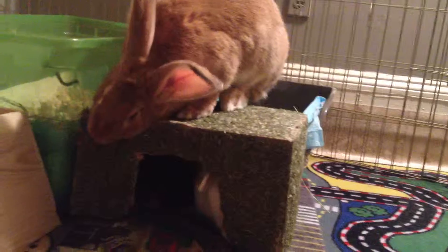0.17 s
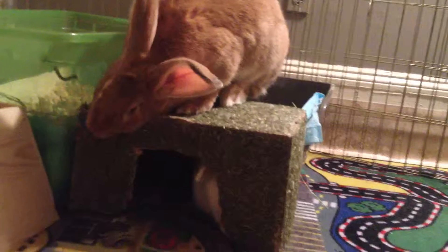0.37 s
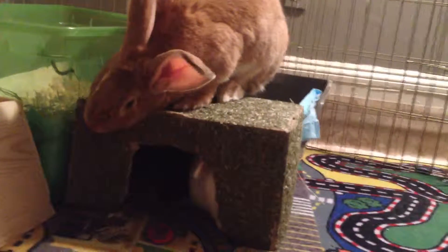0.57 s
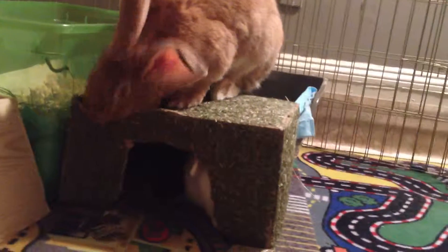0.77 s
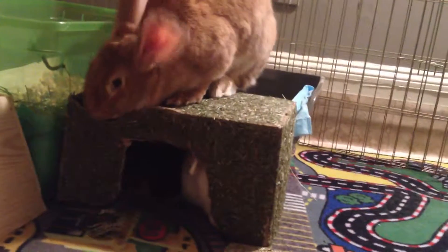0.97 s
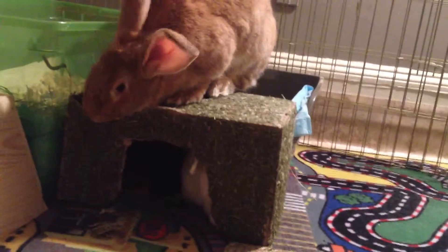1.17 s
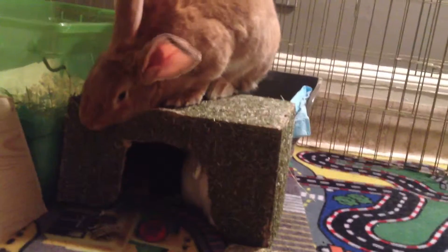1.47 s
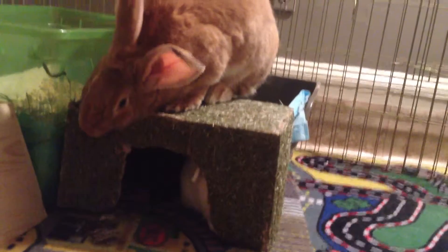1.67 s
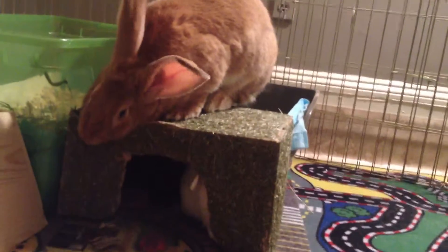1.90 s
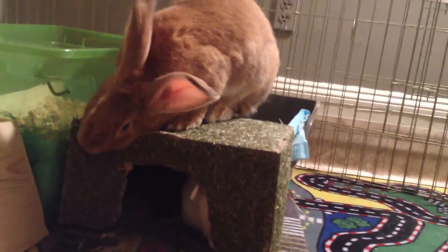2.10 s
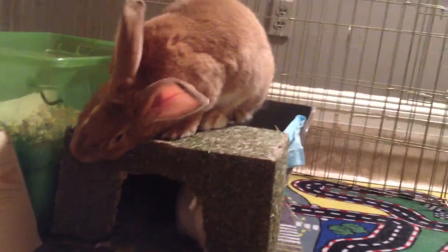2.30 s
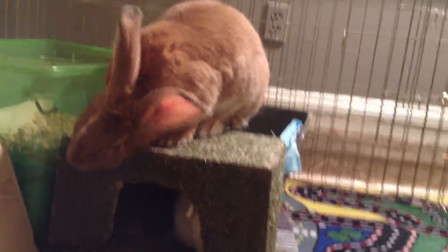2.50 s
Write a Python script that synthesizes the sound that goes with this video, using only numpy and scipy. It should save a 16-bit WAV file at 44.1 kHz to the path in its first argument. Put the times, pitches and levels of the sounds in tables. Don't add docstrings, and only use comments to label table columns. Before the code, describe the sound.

A rabbit gnaws a hollow pressed-grass box, with crisp crunches and woody thumps in a quiet room

```python
import sys
import numpy as np
from scipy import signal
from scipy.fft import rfft, irfft
from scipy.io import wavfile
from scipy.ndimage import uniform_filter1d

SR = 44100
rng = np.random.default_rng(int(sys.argv[2]) if len(sys.argv) > 2 else 0)


def boost_factor(decibels):
    exponent = np.asarray(decibels, float) / 20
    return 10 ** exponent


def transcribe(signal):
    frames = np.atleast_2d(signal).T
    limited = np.clip(frames, -1, 1)
    pcm = np.round(limited * 32767).astype(np.int16)
    wavfile.write(sys.argv[1], SR, pcm)


N = 116865
TOP_HZ, MIC_LOW_HZ = 15400, 81.3


def unit(x):
    return x / np.sqrt(np.mean(x ** 2))


def band(x, lo_hz, hi_hz, order=2):
    edges = [lo_hz, min(hi_hz, SR * .45)]
    return signal.sosfilt(signal.butter(order, edges, "band", fs=SR, output="sos"), x)


def highpass(x, hz):
    return signal.sosfilt(signal.butter(2, hz, "high", fs=SR, output="sos"), x)


def add(out, s, x):
    i = int(s * SR)
    out[i:i + len(x)] += x[:max(N - i, 0)]


# [f/Hz, spectral level/dB]
AIR_COLOUR = [(30, -25), (90, -4), (240, -2), (500, -6), (1000, -11), (2200, -19), (5000, -21),
              (15000, -23.5)]


def floor():
    air_db, hum_db, hum_hz, hum_width_hz = -67, -72, 236.2, 3.6
    colour_hz, colour_db = np.array(AIR_COLOUR).T
    f = np.arange(N // 2 + 1) * SR / N + 1
    db = np.interp(np.log(f), np.log(colour_hz), colour_db)
    air = unit(irfft(rfft(rng.standard_normal(N)) * boost_factor(db), N))
    hum = unit(band(rng.standard_normal(N), hum_hz - hum_width_hz / 2, hum_hz + hum_width_hz / 2, order=1))
    return boost_factor(air_db) * air + boost_factor(hum_db) * hum


# [f/Hz, t60/s]
ROOM_DECAY = [(120, 0.32), (300, 0.29), (800, 0.19), (2000, 0.28), (5000, 0.19), (12000, 0.1)]


def room_tail():
    lump_db, lump_from_hz, delay_s = 2.5, 2000, 0.0019
    t = np.arange(SR // 2) / SR
    lumps = boost_factor(lump_db * unit(uniform_filter1d(rng.standard_normal(len(t)), size=60)))
    decay_hz, decay_t60 = np.array(ROOM_DECAY).T
    tail = np.zeros(len(t))
    for hz in 70 * 2 ** np.arange(0, 8, .5):
        t60 = np.interp(np.log(hz), np.log(decay_hz), decay_t60)
        noise = rng.standard_normal(len(t)) * (lumps if hz > lump_from_hz else 1)
        tail += band(noise, hz / 0.966, hz * 1.422) * 1000. ** (-t / t60) / np.sqrt(t60)
    tail *= np.clip(t / delay_s, 0, 1) ** 2
    return tail / np.sqrt(np.sum(tail ** 2))


def room(x, count=4):
    spot_s = .06
    turn = np.arange(N) / SR / spot_s
    out = np.zeros(N)
    for k in range(count):
        away = np.abs((turn - k) % count - count / 2)
        share = np.cos(np.pi / 2 * np.minimum(away, 1))
        out += signal.fftconvolve(x * share, room_tail())[:N]
    return out


# [t/s, peak level/dB, f/Hz, length/s]
ROCKS = [(0.05, -47.5, 71, 0.0091), (.058, -41.5, 198, 0.021), (0.243, -50, 70, .012),
         (.413, -44.5, 123, 0.026), (.47, -55, 200, 0.037), (.535, -44, 168.6, 0.038),
         (.7, -46.5, 189, 0.031), (.725, -50.5, 119, 0.033), (.77, -50, 188, 0.036),
         (1.515, -53, 205, 0.025), (1.577, -61, 109, 0.035), (1.61, -54, 185, 0.051),
         (1.875, -47, 134, 0.032), (1.942, -57, 212, 0.024), (2.165, -49, 163, 0.021),
         (2.22, -53, 212, 0.019), (2.295, -55, 122, 0.029), (2.36, -50, 160, 0.028)]


def rocks():
    sag = .1
    out = np.zeros(N)
    for s, db, hz, length in ROCKS:
        u = np.arange(int(2 * length * SR)) / SR / length
        swell = (np.e * u * 2 * np.exp(-u * 2)) ** 2
        cycles = hz * length * u * (1 + sag * (.5 - u / 2))
        add(out, s, boost_factor(db) * swell * np.sin(2 * np.pi * cycles))
    return out


# [f/Hz, level/dB, t60/s]
BOX_MODES = [(132.8, -10, 0.3), (160, 2.5, 0.098), (200, -4, 0.15), (250.9, 10, 0.077), (330, -2, 0.09),
             (442.6, 5.5, 0.043), (534, 0.5, 0.038), (630, 3, 0.028), (825, -4, 0.04), (984, 4.5, 0.04),
             (1162, -0.5, 0.02), (1420, -9.5, 0.036), (1787, -5.5, 0.013), (2142, 6, 0.0074)]


def ring(draw, favour_hz=330, bright_db=0):
    favour_db, favour_oct, scatter_db, jitter = 9, 0.23, 2, .025
    bright_from_hz, bright_top_hz = 880, 1340
    rise_cycles, late_hz, crest_s = 1.3, 400, .004
    damp_cycles = 26
    sag, sag_s = 0.038, 0.0065
    t = np.arange(SR // 4) / SR
    hz, db, t60 = np.array(BOX_MODES).T[:, :, None]
    level_draw, pitch_draw = draw[0][:, None], draw[1][:, None]
    near = np.exp(-.5 * (np.log2(hz / favour_hz) / favour_oct) ** 2)
    bright = (hz > bright_from_hz) * np.minimum(bright_top_hz / hz, 1)
    db = db + favour_db * near + bright_db * bright + scatter_db * level_draw
    rise_s = rise_cycles / hz * np.maximum(late_hz / hz, 1)
    rise = 1 - np.exp(-(t / rise_s) ** 2)
    decay = 1000. ** (-t / np.minimum(t60, damp_cycles / hz))
    clock = t - crest_s + sag * sag_s * (1 - np.exp(-t / sag_s))
    wave = np.cos(2 * np.pi * hz * (1 + jitter * pitch_draw) * clock + level_draw)
    return highpass(np.sum(boost_factor(db) * decay * rise * wave, axis=0), 121)


def grains(per_s):
    spread_db, grain_ms = 1.8, 0.29
    hits = (rng.random(N) < per_s / SR) * boost_factor(spread_db * rng.exponential(size=N))
    decay = np.exp(-np.arange(200) / SR * 1000 / grain_ms)
    return unit(np.convolve(hits, decay)[:N] * rng.standard_normal(N))


# [t/s, length/s, rustle level/dB, box level/dB, f/Hz]
RASPS = [(0.034, 0.14, -59.5, -43.5, 4380), (0.165, 0.091, -62, -52, 9500),
         (0.384, 0.053, -50.5, -33.5, 6700), (0.628, 0.036, -62.5, -47.5, 9200),
         (0.679, 0.12, -50.5, -44.5, 6800), (0.708, 0.044, -53, -52, 10100),
         (0.764, 0.083, -54.5, -47.5, 4900), (0.828, 0.32, -68.5, -120, 2004),
         (1.442, 0.11, -67.5, -53, 4040), (1.718, 0.052, -71, -49, 3000), (1.641, 0.27, -66, -52, 9000),
         (1.835, 0.2, -61, -54.5, 10100), (2.041, 0.068, -59, -45, 8600), (2.102, 0.069, -58.5, -55, 7100),
         (2.262, 0.072, -70, -50, 4860), (2.469, 0.037, -67, -51, 7460), (2.621, 0.058, -64, -58, 6540)]


def rasps():
    crumb_db, patchy_db = -4, 0
    rise = 0.46
    fibres, crumbs = grains(7000), grains(600)
    tap = ring(np.zeros((2, len(BOX_MODES))))
    rumble = unit(signal.fftconvolve(fibres + crumbs, tap)[:N])
    crumbs = boost_factor(crumb_db) * unit(band(crumbs, 815, 3000))
    patchy = boost_factor(patchy_db * unit(uniform_filter1d(rng.standard_normal(N), size=500)))
    t, rustle, box = np.arange(N) / SR, np.zeros(N), np.zeros(N)
    for s, length, rustle_db, box_db, hz in RASPS:
        stroke = np.interp((t - s) / length, [0, rise / 4, rise, 1], [0.0051, 0.44, 0.46, 0.00071])
        scrape = patchy * unit(band(fibres, hz / 2.0, hz * 1.48, order=1))
        rustle += boost_factor(rustle_db) * stroke * (scrape + crumbs)
        box += boost_factor(box_db) * stroke * rumble
    return rustle, box


def stalk_colour(near, broad, db, hz, spread):
    broad_db = -9.5 + 0.35 * (db + 38)
    return band(near, hz / spread, min(hz * spread, TOP_HZ)) + boost_factor(broad_db) * band(broad, 1290, 11800)


# [t/s, peak level/dB, f/Hz, breadth/octaves]
SNAPS = [(0.053, -44.5, 7100, 0.38), (0.1027, -44.5, 2310, 0.3), (0.1678, -47, 10800, 0.6),
         (0.176, -47, 10300, 0.41), (0.2099, -46.5, 7300, 0.47), (0.2455, -24.5, 7580, 0.15),
         (0.3628, -44.5, 7300, 0.61), (0.3775, -50, 7100, 0.33), (0.3892, -33, 8700, 0.8),
         (0.403, -28.5, 3880, 0.73), (0.414, -40, 3250, 0.39), (0.5185, -52, 3280, 0.98),
         (0.6405, -47, 9000, 0.56), (0.686, -59, 7290, 0.69), (0.7048, -41, 3770, 0.58),
         (0.7284, -38, 4600, 0.39), (0.791, -38, 5100, 0.56), (0.815, -47, 5000, 0.36),
         (0.9438, -44.5, 12600, 0.41), (1.2072, -47.5, 14000, 0.27), (1.311, -51.5, 10800, 0.71)]
# [t/s, peak level/dB, f/Hz, breadth/octaves]
SNAPS_LATE = [(1.4055, -38.5, 9100, 0.41), (1.4663, -58, 2350, 0.5), (1.497, -48, 7240, 1),
              (1.519, -56.5, 2340, 0.52), (1.546, -47.5, 8550, 1), (1.5796, -41, 2280, 0.085),
              (1.602, -53.5, 2440, 0.25), (1.6925, -67, 7000, 0.57), (1.7055, -51, 10000, 0.46),
              (1.714, -49, 11000, 0.86), (1.7181, -48.5, 9600, 0.38), (1.7445, -51, 2720, 0.38),
              (1.7765, -39.5, 6300, 1), (1.7874, -44.5, 8000, 0.64), (1.8348, -47, 6000, 0.61),
              (1.867, -46.5, 9600, 0.15), (1.9375, -51, 2770, 0.51), (1.98, -53.5, 8100, 0.21),
              (2.0273, -38.5, 7200, 0.2), (2.0535, -53, 2390, 0.38), (2.1095, -42.5, 9400, 0.55),
              (2.1277, -46, 2430, 0.46), (2.188, -52, 7000, 0.38), (2.2689, -31.5, 7050, 0.67),
              (2.35, -56, 7800, 0.65), (2.4731, -41, 6800, 0.34), (2.5025, -39.5, 6800, 0.32),
              (2.516, -44, 6570, 0.2), (2.596, -49, 6200, 0.43)]
# [t/s, peak level/dB, f/Hz]
TICKS = [(0.381, -57, 7500), (.3912, -43, 10000), (.408, -63, 7450), (.4105, -58, 6000), (1.668, -59, 2460),
         (1.675, -59, 5030), (1.7255, -61, 10500), (1.7355, -60, 10500), (1.744, -49, 10500),
         (1.753, -52, 8500), (1.757, -58, 6000), (1.851, -56, 5600), (1.987, -54, 7500),
         (2.0219, -50, 7400), (2.033, -52, 7000), (2.0425, -59, 8000), (2.048, -50, 9500),
         (2.0538, -43, 8300), (2.0615, -52, 12000), (2.068, -55, 10500), (2.084, -55, 10500),
         (2.096, -53, 10500), (2.1281, -36, 8050), (2.141, -66, 9000), (2.2276, -52.5, 7860),
         (2.272, -43.5, 4570), (2.281, -56, 6070), (2.3, -55, 4500), (2.323, -50.5, 7050)]


def snaps():
    tick_oct, ragged = 0.19, 2
    burst_ms, rise_ms, grow_per_db = 1.4, 0.12, 0.032
    wall_blur_oct = .5
    rows = list(SNAPS) + list(SNAPS_LATE) + [(*tick, tick_oct) for tick in TICKS]
    out, to_walls = np.zeros(N), np.zeros(N)
    ms = np.arange(900) / SR * 1000
    impulse = 1. * (ms == 0)
    for s, db, hz, octaves in rows:
        noise = rng.standard_normal(len(ms))
        noise = noise * np.abs(noise) ** (ragged - 1)
        length_ms = burst_ms * boost_factor(grow_per_db * (db + 23))
        shape = np.exp(-ms / length_ms) * (1 - np.exp(-ms / rise_ms))
        spread = 2 ** max(octaves, .1)
        crack = stalk_colour(noise * shape, noise[::-1] * shape, db, hz, spread)
        crack = boost_factor(db) * crack / np.abs(crack).max()
        click = stalk_colour(impulse, impulse, db, hz, spread * 2 ** wall_blur_oct)
        add(out, s, crack)
        add(to_walls, s, unit(click) * np.sqrt(np.mean(crack ** 2)))
    return out, to_walls


# [t/s, peak level/dB, favoured f/Hz, bright level/dB]
BITES = [(0.046, -33.5, 450, -3), (0.066, -37.5, 185, -5), (.099, -54, 450, 0), (.168, -43, 450, 7),
         (0.209, -40, 477, -5), (0.244, -21.5, 406, 2), (.378, -36, 580, 3), (0.388, -37, 630, 12),
         (0.4016, -25.5, 520, 12.5), (0.518, -27, 425, -9.5), (.636, -55, 515, 20), (.707, -43.5, 250, 0),
         (.727, -38.5, 443, 19), (1.405, -49.5, 445, 7), (1.449, -36, 308, -7), (1.495, -45.5, 620, 5),
         (1.576, -34, 474, -5), (1.726, -37, 323, -8), (1.743, -39.5, 576, -4), (1.779, -42, 303, 1),
         (1.865, -26.5, 358, -8.5), (2.028, -52, 503, -6), (2.046, -36, 342, -4.5), (2.063, -46.5, 290, 7),
         (2.126, -43.5, 400, 0), (2.138, -30, 463, 6), (2.268, -41.5, 630, 6), (2.278, -41, 330, -17),
         (2.347, -41, 520, -1), (2.358, -43.5, 530, -4), (2.474, -55, 330, 13), (2.499, -55, 560, 8),
         (2.514, -41, 643, 12), (2.587, -46, 288, -5), (2.598, -46, 476, -1)]


def bites():
    crush_ms, push_ms = 2.5, 0.24
    out = np.zeros(N)
    ms = np.arange(300) / SR * 1000
    for s, db, hz, bright_db in BITES:
        steps = np.round((rng.random(len(ms)) - .5) * 1.04)
        kicks = steps * np.exp(-ms / crush_ms) * 0.47 + (ms == 0)
        push = np.convolve(kicks, np.exp(-ms / push_ms))
        tap = ring(rng.standard_normal((2, len(BOX_MODES))), hz, bright_db)
        thump = np.convolve(tap, push)
        add(out, s, boost_factor(db) * thump / np.abs(thump).max())
    return out


def scene():
    box_room_db, stalk_room_db = -3.5, -5
    rustle, rumble = rasps()
    cracks, to_walls = snaps()
    box = bites() + rumble
    box_send = boost_factor(box_room_db) * band(box, MIC_LOW_HZ / 2, 1800, order=1)
    wet = room(box_send + boost_factor(stalk_room_db) * (to_walls + rustle))
    return (box + rocks() + cracks + rustle + wet + floor())[None]


def band_limit(x):
    return signal.sosfilt(signal.butter(12, 16470, fs=SR, output="sos"), x)


def record(dry):
    start_s, fade_s = 0.035, 0.002
    x = highpass(dry, MIC_LOW_HZ)
    x = signal.sosfilt(signal.ellip(6, .2, 26, TOP_HZ, fs=SR, output="sos"), x)
    x = x * np.clip((np.arange(N) / SR - start_s) / fade_s, 0, 1)
    return band_limit(x)


dry = scene()
out = record(dry)
transcribe(out)
```